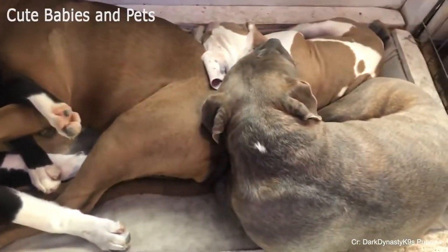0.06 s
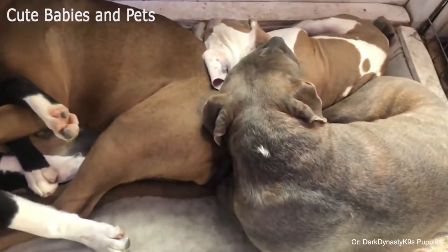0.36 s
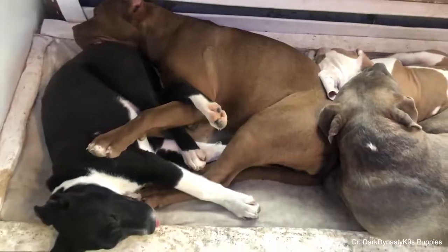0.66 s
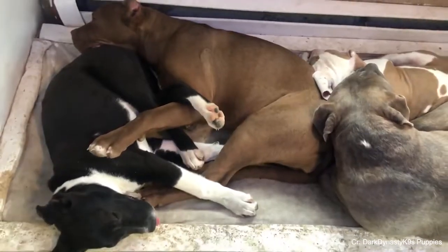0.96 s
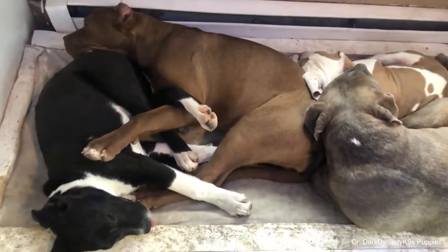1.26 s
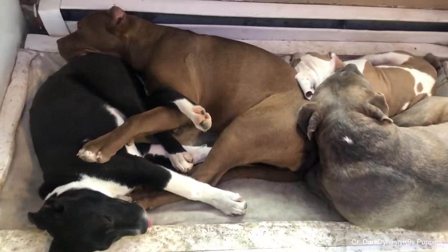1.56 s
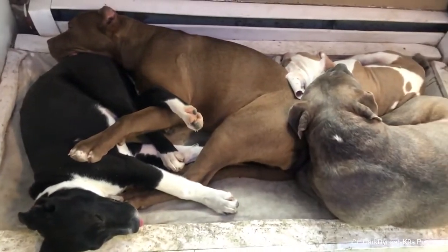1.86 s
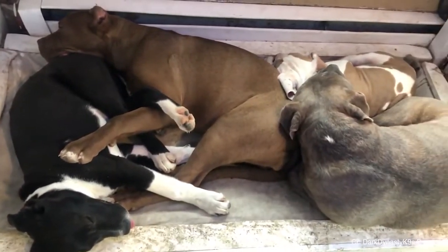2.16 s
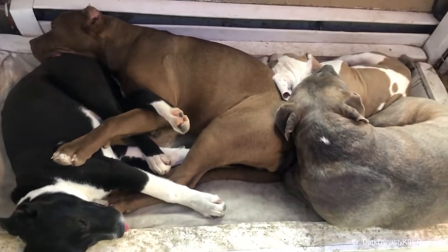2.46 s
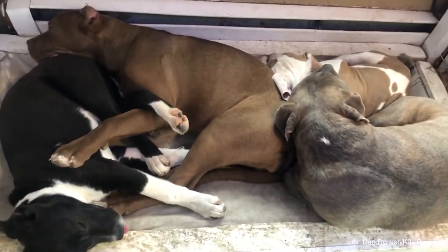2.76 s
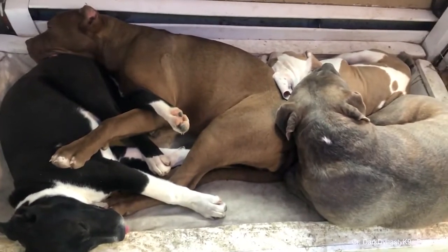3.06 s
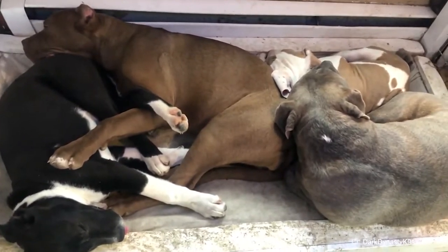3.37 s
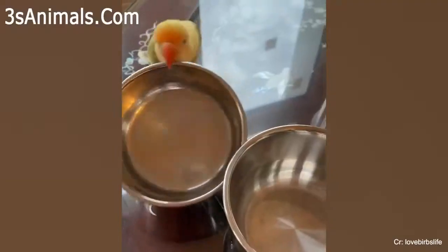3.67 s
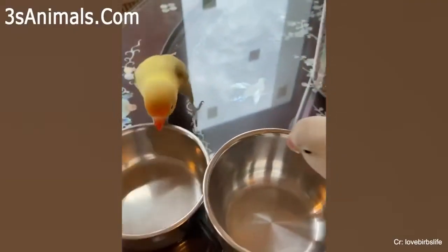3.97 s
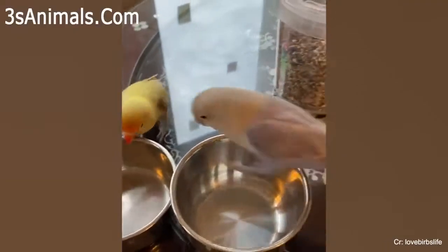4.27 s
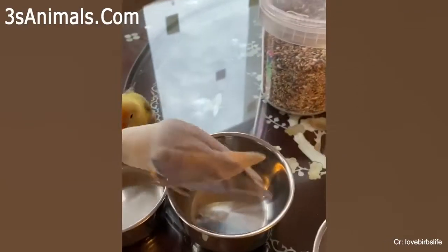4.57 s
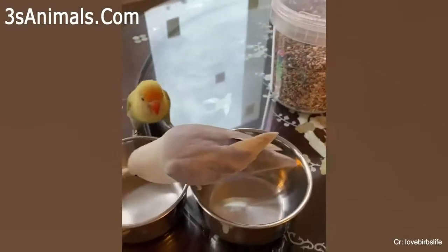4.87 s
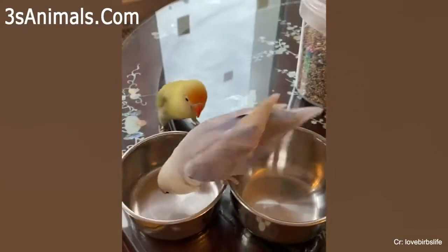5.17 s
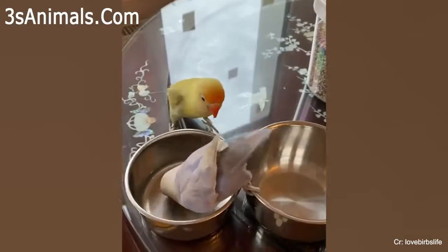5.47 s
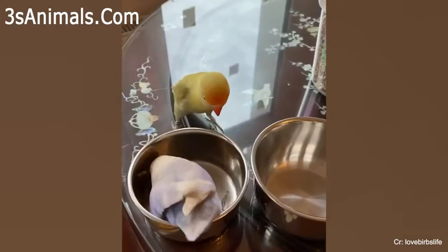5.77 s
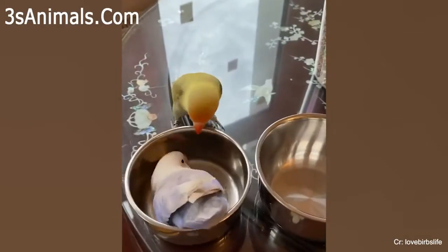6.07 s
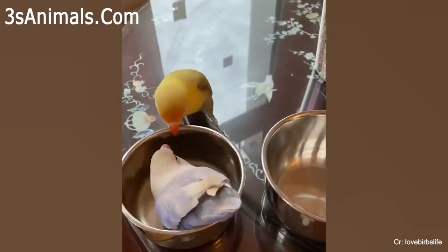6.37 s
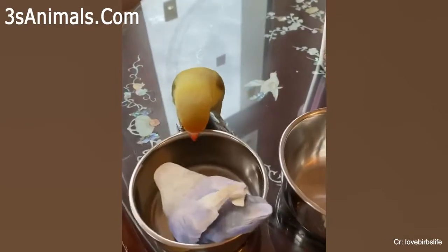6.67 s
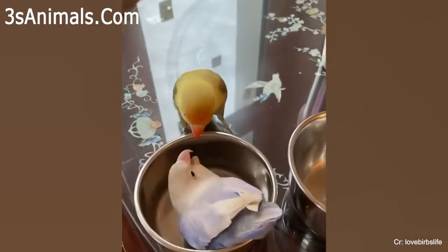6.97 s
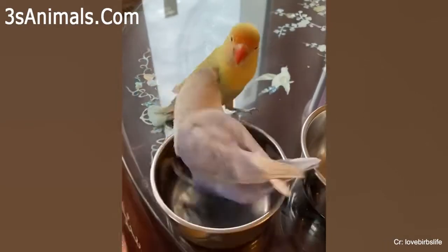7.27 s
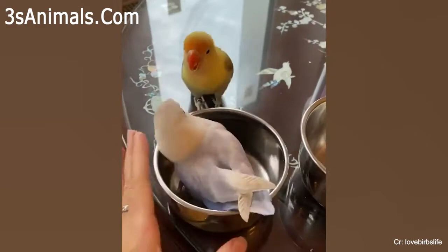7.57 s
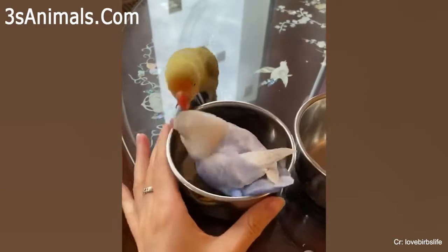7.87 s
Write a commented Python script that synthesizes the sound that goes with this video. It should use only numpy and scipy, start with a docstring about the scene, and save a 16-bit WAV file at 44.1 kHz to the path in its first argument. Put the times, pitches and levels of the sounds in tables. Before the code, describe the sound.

For the first 3.5 seconds a low, steady room hum sits under dogs shifting on blankets: faint fur rustles, a thin hiss and soft thumps, mostly around 1.1 to 1.8 and 2.6 to 3.2 seconds. At 3.5 the sound cuts to a quieter room, close and in stereo with slight echo. A steel bowl skids on a glass tabletop with a gritty squeal, clanks into another at 3.6, bounces and rings. From 4 to 5 seconds small birds' beaks and claws tick and scrape on the steel, the bases thud and feathers brush faintly. At 5.3 a bird hops into the smaller bowl, making a loud, clear, bell-like ring that throbs as the bowl rocks and is damped by about 5.9. Lighter taps, knocks and short scrapes follow, ending in a quick run of duller clinks from 7.5 to 8 as a hand steadies the bowl.

```python
"""First, dogs doze in a humming room, nudging their bedding and sliding their fur over blankets.
At 3.49 s the scene changes to a quiet room where two small birds climb over two steel bowls on a
glass-topped table. A beak tugs one bowl, which skids, hits the other, bounces and rings. Beaks and
claws tick on the steel, feathers brush it, the bases thud, and there are short, gritty scrapes.
Near 5.3 s a bird hops into the small bowl, which rocks and rings like a bell until a grip damps it.
Lighter taps follow, and near the end a hand steadies the bowl."""
import sys
import numpy as np
from scipy import signal
from scipy.fft import rfft, irfft, next_fast_len
from scipy.io import wavfile

SR = 44100
rng = np.random.default_rng(int(sys.argv[2]) if len(sys.argv) > 2 else 0)


def dump_mix(stems):
    """Bounce the given channels to the path in sys.argv[1] as a 16-bit WAV at rate SR."""
    frames = np.atleast_2d(stems).T  # one column per channel
    limited = np.clip(frames, -1, 1)  # hard clip at full scale
    pcm = np.round(limited * 32767).astype(np.int16)
    wavfile.write(sys.argv[1], SR, pcm)


N = 353020
TIME = np.arange(N) / SR


def from_db(db):
    """Turn decibels into a number to multiply by."""
    return 10 ** (np.asarray(db) / 20)


def unit_level(x):
    """Scale a signal so its average level (rms) is 1."""
    return x / np.sqrt(np.mean(x ** 2) + 1e-20)


def at_hz(rows, hz):
    """Read a frequency table at any pitch, blending between its rows."""
    points, *columns = np.transpose(rows)
    return [np.interp(np.log(np.maximum(hz, 1)), np.log(points), c) for c in columns]


def drift(rate):
    """A random wobble that heads for a new value `rate` times a second."""
    knots = rng.standard_normal(int(rate * N / SR) + 2)
    return unit_level(np.interp(TIME * rate, np.arange(len(knots)), knots))


def grains(size, spread_db):
    """Noise made of tiny slips of unequal strength."""
    return rng.standard_normal(size) * from_db(spread_db * np.minimum(rng.exponential(1, size), 6))


def coloured(x, spectrum):
    """Shape a noise from bass to treble, at level 1."""
    size = next_fast_len(N, True)
    gain = from_db(at_hz(spectrum, np.fft.rfftfreq(size, 1 / SR))[0])
    return unit_level(irfft(rfft(x, size) * gain, size)[:N])


def band(x, low_hz, high_hz):
    """Keep what lies between two frequencies."""
    edges = [low_hz, min(high_hz, SR / 2 - 500)]
    return signal.sosfilt(signal.butter(2, edges, "band", fs=SR, output="sos"), x)


def resonate(x, resonances):
    """Shake an object whose notes die quickly; every second note is flipped in sign."""
    out = 0
    for k, (hz, width, db) in enumerate(resonances):
        r = np.exp(-np.pi * width / SR)
        poles = [1, -2 * r * np.cos(2 * np.pi * hz / SR), r * r]
        out = out + (-1) ** k * from_db(db) * (1 - r * r) / 2 * signal.lfilter([1, 0, -1], poles, x)
    return out


def note(force, hz, sharpness):
    """One quickly dying note; more sharpness gives a clearer pitch."""
    return band(resonate(force, [(hz, hz / sharpness, 0)]), hz / 2, hz * 2)


def clicks_at(times, levels_db):
    """One click at each time."""
    out = np.zeros(N)
    out[np.minimum(np.round(times * SR).astype(int), N - 1)] = from_db(levels_db)
    return out


def bursts(times, levels_db, lengths, body, first_touch, spread_db, rise_share=0.27):
    """Each contact shakes a body with a first touch, then a dying chatter of slips."""
    age, out = np.arange(SR // 5) / SR, np.zeros(N + SR)
    for s, db, length in zip(times, levels_db, lengths):
        progress = age / max(length, 1 / SR)
        force = grains(len(age), spread_db) * np.minimum(progress / rise_share, 1) * np.exp(-progress)
        force[0] += first_touch * np.linalg.norm(force)
        sound, start = body(force + 1e-18), round(s * SR)
        gain = from_db(db) * np.sqrt(SR / 50)  # the level counts as if spread over 20 ms
        out[start:start + len(age)] += gain * sound / np.linalg.norm(sound)
    return out[:N]


def stroke(start, length, db, rise_s=0.012, fade_s=0.015):
    """A loudness curve that rises, holds and dies away."""
    age = TIME - start
    return from_db(db) * np.clip(age / rise_s, 0, 1) * np.exp(-np.maximum(age - length, 0) / fade_s)


# The tone of the dogs' room. Each row: frequency in Hz, relative level in dB.
HUM_TONE = [(15, -58), (25, -0.5), (169, 2.5), (560, -7.5), (1380, -14), (3000, -19), (15500, -33.5)]
def room_hum(level_db=-57):
    """The steady, low hum around the dogs."""
    return from_db(level_db) * coloured(rng.standard_normal(N), HUM_TONE)


# Pushes on the bedding. Each row: start in seconds, thump level in dB, rub level in dB, rub pitch in Hz.
NUDGES = [(0.26, -60, -62.5, 5500), (0.476, -69, -60, 2400), (0.497, -66, -66, 14900),
          (1.089, -58, -56, 1400), (1.419, -48, -52.5, 644), (1.606, -44, -58, 1010),
          (1.715, -49, -49, 2350), (2.581, -44, -52.5, 890), (2.804, -49, -64, 1190),
          (3.095, -51.5, -48.5, 2020)]
def nudges(heavy_db=-51, thump_s=0.026, rub_s=0.041):
    """A dog nudges its bedding: a soft thump and a rub with its own pitch."""
    s, thump_db, _, _ = np.transpose(NUDGES)
    shares = np.minimum(from_db(thump_db - heavy_db), 1)  # light nudges are shorter
    thumps = bursts(s, thump_db, thump_s * shares, lambda f: band(f, 107, 420),
                    first_touch=0, spread_db=0.5)
    rubs = sum(bursts([t], [db], [rub_s * share], lambda f: note(f, hz, sharpness=3),
                      first_touch=0, spread_db=4) for (t, _, db, hz), share in zip(NUDGES, shares))
    return thumps + rubs


# The tone of a rubbed blanket. Each row: frequency in Hz, relative level in dB.
BLANKET_TONE = [(88, -67), (150, 2.5), (1170, -15.5), (2600, -13), (7130, -18), (15500, -24.5)]
# Slides of fur. Each row: start in seconds, length in seconds, level in dB.
RUSTLES = [(0.6, 0.28, -65.5), (1.08, 0.16, -57.5), (1.37, 0.049, -55.5), (1.58, 0.22, -55),
           (2.24, 0.02, -55), (3.19, 0.05, -55.5)]
RUSTLE_RISE_S, RUSTLE_FADE_S = 0.0074, 0.066
def fur_rustles(crumple_db=2):
    """Fur slides over a blanket, which crumples unevenly."""
    loudness = sum(stroke(*row, RUSTLE_RISE_S, RUSTLE_FADE_S) for row in RUSTLES)
    crumple = from_db(crumple_db * drift(39.97))
    return loudness * crumple * coloured(grains(N, spread_db=2.5), BLANKET_TONE)


# One hiss. In order: start in seconds, length in seconds, level in dB, pitch in Hz.
STIR_HISS = (1.08, 0.8, -64.5, 6500)
def stirring():
    """A thin, high hiss as a dog stirs."""
    start, length, db, hz = STIR_HISS
    hiss = unit_level(note(rng.standard_normal(N), hz, sharpness=3))
    return stroke(start, length, db, RUSTLE_RISE_S, RUSTLE_FADE_S) * hiss


# The tone of the birds' room. Each row: frequency in Hz, relative level in dB.
HUSH_TONE = [(15, -30.5), (48, 12.5), (103, 3), (7500, -34.5), (11100, -41.5), (13000, -41.5)]
def room_hush(level_db=-65.5):
    """The faint, low hush around the birds."""
    return from_db(level_db) * coloured(rng.standard_normal(N), HUSH_TONE)


# Short notes of a bowl's base. Each row: pitch in Hz, width in Hz, relative level in dB.
BASE_NOTES = [(82, 45, -4.5), (234.5, 55, -5.5), (390, 108, 0), (514.5, 58, -0.5), (641, 55, 1)]
def thud(force):
    """The base of a bowl thuds on the table top."""
    return band(resonate(force, BASE_NOTES), 33, 740)


# Short notes of a bowl's wall. Each row: pitch in Hz, width in Hz, relative level in dB.
WALL_NOTES = [(920, 350, 0), (1600, 230, 3), (2112, 410, -2.5), (2920, 340, -1.5), (4160, 1900, -6)]
def clack(force):
    """The wall of a bowl clacks, held by a foot or the other bowl."""
    return band(resonate(force, WALL_NOTES), 590, 3400)


# Short notes of a bowl's rim. Each row: pitch in Hz, width in Hz, relative level in dB.
RIM_NOTES = [(5840, 1220, -2.6), (6940, 620, 1.3), (8400, 1300, -0.068), (10020, 1700, 0.67),
             (12180, 1400, -1.1)]
def tick(force):
    """The thin steel rim ticks under a beak or claw."""
    return band(resonate(force, RIM_NOTES), 5800, SR / 2)


def squeal(hz, wander=0.025, width_hz=110, overtone_db=-7):
    """Sticking steel sings a rough note whose pitch wanders as the point of contact moves."""
    phase = 2 * np.pi * np.cumsum(hz * (1 + wander * drift(22))) / SR
    tones = [drift(width_hz) * np.cos(k * phase) + drift(width_hz) * np.sin(k * phase) for k in (1, 2, 3)]
    return unit_level(tones[0] + from_db(overtone_db) * sum(tones[1:]))


# Slides of a bowl. Each row: start in seconds, length in seconds, level in dB, squeal pitch in Hz,
# hiss in dB compared with the grind.
SKIDS = [(3.504, 0.12, -48, 1302, -7.5), (3.651, 0.4, -49, 1154, -4), (4.012, 0.075, -45.5, 2010, 5)]
def skidding(uneven_db=2, rumble_db=-5.5, squeal_db=-1):
    """A beak tugs the bowl, which sticks and slips on the glass: a grind, a squeal and a hiss."""
    slips = grains(N, spread_db=2) * from_db(uneven_db * drift(70))
    grind = from_db(rumble_db) * unit_level(thud(slips)) + unit_level(clack(slips))
    hiss = unit_level(tick(slips))
    return sum(stroke(s, length, db) * (grind + from_db(squeal_db) * squeal(hz) + from_db(hiss_db) * hiss)
               for s, length, db, hz, hiss_db in SKIDS)


# A bowl tips and knocks on the table or the other bowl; the first row is the collision.
# Each row: start in seconds, thud, clack and tick levels in dB, chatter time in seconds.
KNOCKS = [(3.629, -31, -24, -26.5, 0.0051), (4.121, -41.5, -58, -51, 0.0017),
          (4.282, -40, -42, -52, 0.0057), (4.298, -43.5, -36, -51.5, 0.0074),
          (4.467, -38.5, -44, -50.5, 0.015), (4.701, -29.5, -34.5, -40, 0.0026),
          (5.269, -35.5, -28, -23, 0.0022), (5.334, -30.5, -31, -13.5, 0.00067),
          (5.729, -46, -46.5, -50, 0.023), (6.017, -46, -42.5, -44, 0.0051),
          (6.383, -40, -47.5, -52.5, 0.004), (6.634, -37, -45.5, -50, 0.014),
          (7.434, -48, -45, -50, 0.0089)]
def knocking():
    """Knocks, pecks and steps shake base, wall and rim; the heavy base chatters longest."""
    s, thud_db, clack_db, tick_db, chatter = all_contacts()
    return (bursts(s, thud_db, chatter + 0.02, thud, first_touch=0.39, spread_db=2)
            + bursts(s, clack_db, chatter, clack, first_touch=0.19, spread_db=5.5)
            + bursts(s, tick_db, chatter, tick, first_touch=0.38, spread_db=6.5))


def bounces(count=6, first_gap_s=0.042, gap_ratio=0.65, first_db=-8, loss_db=2.5, chatter_s=0.003):
    """After the collision the bowl bounces, each time sooner and softer."""
    s, *levels_db, _ = KNOCKS[0]
    times = s + np.cumsum(first_gap_s * gap_ratio ** np.arange(count))
    return [(t, *(np.array(levels_db) + first_db - loss_db * k), chatter_s) for k, t in enumerate(times)]


def all_contacts(tap_base_db=-12, tap_wall_db=-5):
    """Knocks, bounces and taps, in the columns of KNOCKS. A tap hardly moves the base."""
    taps = [(s, clack_db + tap_base_db, clack_db + tap_wall_db, tick_db, TAP_CHATTER_S)
            for s, tick_db, clack_db, _ in TAPS]
    return np.transpose(list(KNOCKS) + bounces() + taps)


# Blows that ring a whole bowl. Each row: start in seconds, strength in dB on the small bowl,
# then on the large one.
RIM_BLOWS = [(3.629, -39, -17.5), (4.7, -51, -47.5), (5.270, -16.5, -58), (7.993, -44, -77)]
# The notes of each bowl. Each row: pitch in Hz, relative level in dB, seconds to fade by 60 dB.
LARGE_BOWL = [(387, -13, .5), (975, -11, .25), (1110, -6, .22), (1550, -8, .26), (1612, -2, .29),
              (2519, -13, .45), (3510, -20, .75), (4947, -26, .7), (5540, -19, .65), (6754, -16, .5),
              (6852, -15, .42), (7150, -15, .36), (13000, -19, .45)]
SMALL_BOWL = [(628, -16, .9), (1608, 0, 2.25), (2505, -7, 1.05), (2557, -14, .55), (3205, -29, 1.2),
              (3832, -22.5, 1.1), (5382, -30, .9)]
def ringing(cross_s=4.6, small_claw_db=-2, large_claw_db=-7, other_bowl_db=-18, hardest_db=-38,
            main_swell_s=0.022, overtone_grip=0.1):
    """The bowls ring as a bird crosses from the large to the small one, whose main note swells."""
    blow_s, small_db, large_db = np.transpose(RIM_BLOWS)
    s, _, _, tick_db, _ = all_contacts()
    crossed = s > cross_s
    pressed_db = np.minimum(hardest_db - tick_db, 0)  # a hard touch stays on and chokes its own ring
    small, main_hz = 0, max(SMALL_BOWL, key=lambda row: row[1])[0]
    for hz, db, fade_s in SMALL_BOWL:
        grip, swell_s = (1, main_swell_s) if hz == main_hz else (overtone_grip, 0)
        # Earlier grip loss is added back, so a ring loses only what comes after its own hit.
        blows_db = small_db + grip * grip_loss(blow_s)
        claw_db = small_claw_db + pressed_db + other_bowl_db * ~crossed + grip * grip_loss(s)
        ring = bowl_note(hz, fade_s, blows_db, claw_db, swell_s)
        small = small + from_db(db - grip * grip_loss(TIME)) * ring
    claw_db = large_claw_db + pressed_db + other_bowl_db * crossed
    large = sum(from_db(db) * bowl_note(hz, fade_s, large_db, claw_db) for hz, db, fade_s in LARGE_BOWL)
    return small * rocking() + large


def bowl_note(hz, fade_s, blows_db, claw_db, swell_s=0, varied_db=4):
    """One note of a bowl: rim blows ring it fully; small touches reach high notes best."""
    s, _, clack_db, tick_db, _ = all_contacts()
    reach_db = (tick_db if hz > 4300 else clack_db) + 40 * np.log10(min(hz / 5000, 1))
    touches = clicks_at(s, reach_db + claw_db + varied_db * rng.standard_normal(len(s)))
    blows = clicks_at(np.array(RIM_BLOWS)[:, 0], blows_db)
    if swell_s:
        age = np.arange(int(swell_s * SR) + 1) / SR
        blows = signal.oaconvolve(blows, np.cos(2 * np.pi * hz * age) / len(age))[:N]
    r, w = from_db(-60 / (fade_s * SR)), 2 * np.pi * hz / SR  # each click starts a fading sine wave
    ring = signal.lfilter([0, np.sin(w)], [1, -2 * r * np.cos(w), r * r], blows + touches + 1e-18)
    return rng.choice([-1, 1]) * ring


def high_notes(low_hz, high_hz, fade_s, count, uneven_db=3, side_scatter=0.13):
    """A fresh cluster of thin steel's crowded high notes, a little different left and right."""
    age = np.arange(SR // 2) / SR
    lines = np.zeros((2, len(age)), complex)
    pitches = low_hz + (high_hz - low_hz) * (np.arange(count) + rng.random(count)) / count
    phases = 2 * np.pi * rng.random(count) + side_scatter * rng.standard_normal((2, count))
    strengths = from_db(uneven_db * rng.standard_normal(count))
    lines[:, (pitches * age[-1]).astype(int)] = strengths * np.exp(1j * phases)
    return unit_level(np.fft.ifft(lines).real * from_db(-60 * age / fade_s)) / np.sqrt(len(age))


def shimmer(touches, level_db=-4, choke_db=-27, free_fade_s=0.28, held_fade_s=0.06, hand_on_s=7.55):
    """Each contact lands somewhere new and rings other high notes; a hand on the bowl deadens them."""
    choke = from_db(choke_db)  # hard blows press on the steel and ring little more than light ones
    force = choke * np.tanh(touches / choke)
    starts = np.unique((all_contacts()[0] * SR).astype(int))
    out = np.zeros((2, N + SR))
    for start, touch in zip(starts, np.split(force, starts)[1:]):
        fade_s = free_fade_s if start < hand_on_s * SR else held_fade_s
        sound = signal.fftconvolve(touch[None], high_notes(2700, 13100, fade_s, count=48), axes=1)
        out[:, start:start + sound.shape[1]] += sound
    return from_db(level_db) * out[:, :N]


# Taps on the steel. Each row: start in seconds, tick level in dB, clack strength in dB, pitch in Hz.
TAPS = [(3.938, -39.5, -46.5, 1330), (4.335, -72, -47.5, 1900), (4.439, -41, -48.5, 2600),
        (5.069, -49.5, -83, 5740), (5.586, -41, -49.5, 2550), (5.642, -30, -47, 1100),
        (6.043, -49.5, -43, 2400), (6.596, -54.5, -53, 1576), (7.213, -69, -60.5, 2750),
        (7.297, -36.5, -60, 3100), (7.525, -57, -47.5, 1636), (7.594, -44.5, -52.5, 1090),
        (7.794, -53.5, -56, 2320), (7.852, -58, -53.5, 2520), (7.869, -40.5, -43.5, 2570),
        (7.912, -48, -52, 1600), (7.949, -49, -46.5, 1640), (7.991, -65, -45.5, 1640)]
TAP_CHATTER_S = 0.0042
def tap_notes(note_db=-1):
    """Each tap of a beak or claw sounds a short note, set by where it lands."""
    return sum(bursts([s], [db + note_db], [TAP_CHATTER_S], lambda f: note(f, hz, sharpness=6),
                      first_touch=0.41, spread_db=-2) for s, _, db, hz in TAPS)


# Feather strokes. Each row: start in seconds, length in seconds, level in dB.
BRUSHES = [(4.1, 1.79, -68.5), (6.27, 0.016, -61.5)]
def feathers(uneven_db=4):
    """Wings and breast brush the bowls as the bird climbs."""
    swish = unit_level(band(grains(N, spread_db=3.5), 500, 5000))
    loudness = sum(stroke(*row, fade_s=RUSTLE_FADE_S) for row in BRUSHES)
    return loudness * from_db(uneven_db * drift(12)) * swish


# Short, gritty scrapes. Each row: start in seconds, length in seconds, level in dB, pitch in Hz.
SCRAPES = [(4.277, 0.036, -44.5, 5780), (5.597, 0.062, -45, 8400), (5.649, 0.021, -43, 3880),
           (6.646, 0.035, -55, 8400), (7.232, 0.034, -51.5, 11150), (7.344, 0.06, -53, 1540),
           (7.913, 0.094, -49.5, 10000)]
def scraping(catches_per_s=300, rub_db=-32, grind_db=-7):
    """Scrapes on the steel, from a claw or a shifting bowl, catch and let go in tiny ticks."""
    catches = rng.random(N) < catches_per_s / SR
    slips = rng.standard_normal(N) * (catches + from_db(rub_db))
    grind = from_db(grind_db) * unit_level(clack(slips))
    return sum(stroke(s, length, db) * (unit_level(note(slips, hz, sharpness=4)) + grind)
               for s, length, db, hz in SCRAPES)


# Slips off the rim. Each row: start in seconds, level in dB, middle pitch in Hz.
FLICKS = [(4.299, -55, 10200), (4.514, -43.5, 10860), (4.689, -38, 10800), (4.738, -33, 11200),
          (6.016, -38, 8420), (7.371, -44.5, 11300)]
def flicks(spread=1.12, fade_s=0.23):
    """A claw slips off the rim and leaves a few thin, high notes ringing."""
    out = 0
    for s, db, hz in FLICKS:
        cluster = high_notes(hz / spread, hz * spread, fade_s, count=8)
        out = out + signal.oaconvolve(clicks_at(np.array([s]), db)[None], cluster, axes=1)[:, :N]
    return out * np.sqrt(SR / 50)


def rocking(start_s=5.316, throbs_per_s=7.35, settle_s=0.34, depth=0.97):
    """The small bowl wobbles after the hop, so its ring throbs until it settles."""
    age = TIME - start_s
    swing = depth * np.exp(-(age / settle_s) ** 6) * (age > 0)
    return np.sqrt(1 - swing * np.sin(np.pi * throbs_per_s * age) ** 2)


def grip_loss(times, start_s=5.545, length_s=0.33, db_per_s=65):
    """How many dB a grip on the small bowl has taken from its main note so far."""
    return db_per_s * np.clip(times - start_s, 0, length_s)


# The echo of the birds' room. Each row: frequency in Hz, seconds to fade by 60 dB, level in dB.
ROOM_ECHO = [(400, 0.7, -6.5), (1320, 0.56, -9), (9100, 0.075, -12.5)]
def echo(x):
    """Sound bounces around the room, and each octave dies at its own pace."""
    age, response = np.arange(SR) / SR, 0
    for hz in 88 * 2.0 ** np.arange(8):
        fade_s, db = at_hz(ROOM_ECHO, hz)
        envelope = from_db(-60 * age / fade_s) * np.clip((age - .003) / .008, 0, 1)
        noise = band(rng.standard_normal(SR), hz / np.sqrt(2), hz * np.sqrt(2))
        response = response + from_db(db) * noise * envelope / np.linalg.norm(envelope)
    return signal.fftconvolve(x, response)[:N]


# Left compared with right. Each row: frequency in Hz, head start in radians, extra level in dB.
LEFT_RIGHT = [(70, 0.12, 0), (430, 1.1, 1.5), (1030, 1.2, 6.5), (2600, 1.31, 0.5), (5500, 1.59, -1),
              (8000, 2.75, 0), (10850, 3.3, 1), (12400, 4.08, -1)]
def stereo(x):
    """Sound reaches two microphone openings out of step and at unequal levels."""
    size = next_fast_len(N + SR // 10)
    lead, balance_db = at_hz(LEFT_RIGHT, np.fft.rfftfreq(size, 1 / SR))
    gains = from_db([balance_db / 2, -balance_db / 2])
    gains = gains / np.sqrt(np.mean(gains ** 2, axis=0))
    return np.fft.irfft(rfft(x, size) * gains * [np.ones(len(lead)), np.exp(-1j * lead)], size)[:, :N]


def birds(ring_echo_db=-12, wide_db=-6, top_hz=13100):
    """The birds and bowls with their echo, over the room's hush."""
    touches = knocking() + tap_notes() + skidding() + scraping() + feathers()
    rings = ringing()
    into_room = touches + from_db(ring_echo_db) * rings
    near = stereo(touches + rings + shimmer(touches) + flicks() + echo(into_room))
    wide = from_db(wide_db) * band(echo(into_room), 400, 12000) * [[1], [-1]]
    return signal.sosfilt(signal.ellip(8, .5, 50, top_hz, fs=SR, output="sos"), near + wide + room_hush())


def scene(change_s=3.49):
    """First the dogs, heard in the middle, then the birds in stereo."""
    dogs = room_hum() + fur_rustles() + nudges() + stirring()
    return np.where(TIME < change_s, dogs, birds())


def record(dry):
    """Round off the tallest peaks and cut the highest treble."""
    ceiling, top_hz = 0.68, 15800
    rounded = ceiling * np.tanh(dry / ceiling)
    return signal.sosfilt(signal.ellip(10, .1, 80, top_hz, fs=SR, output="sos"), rounded)


dry = scene()
out = record(dry)
dump_mix(out)
```